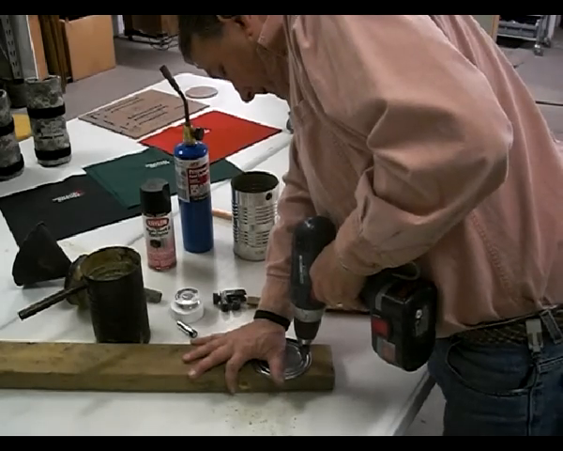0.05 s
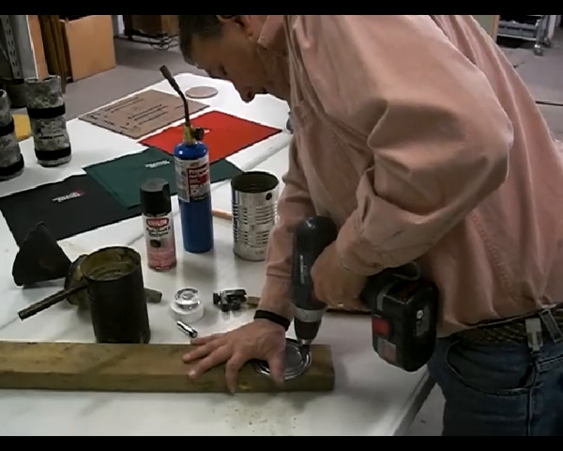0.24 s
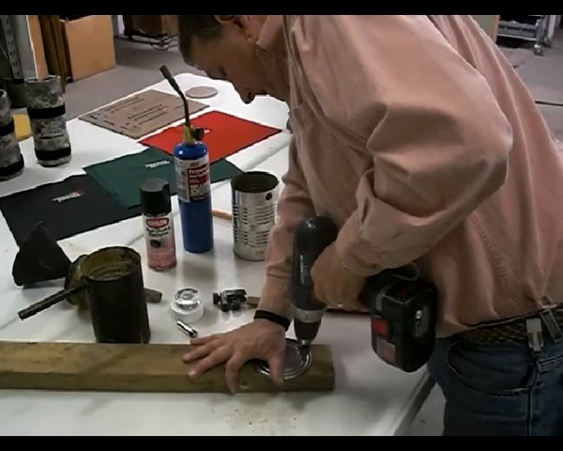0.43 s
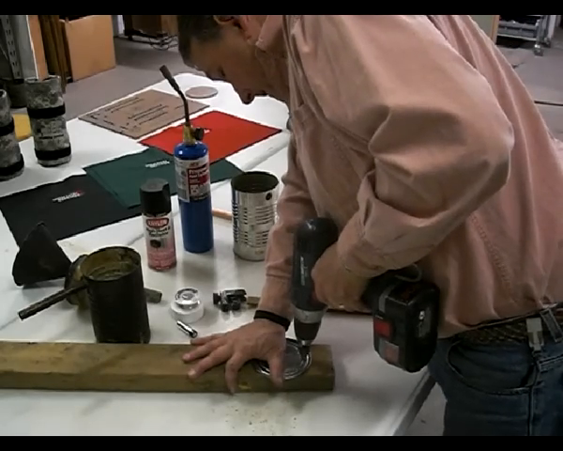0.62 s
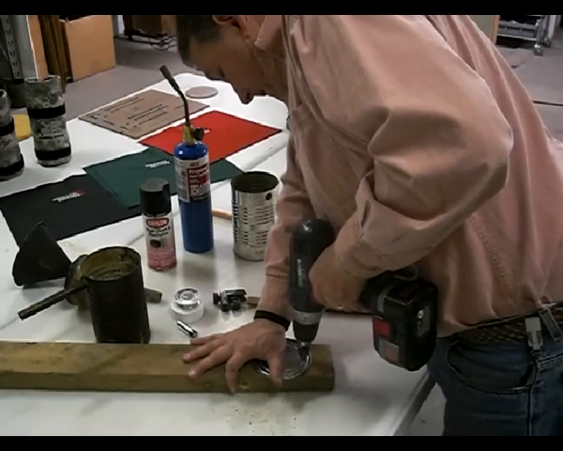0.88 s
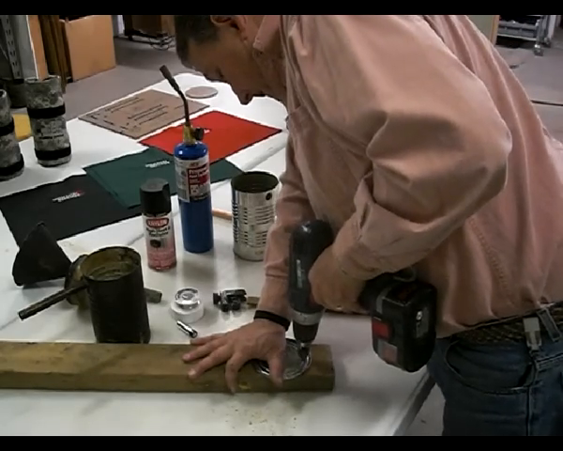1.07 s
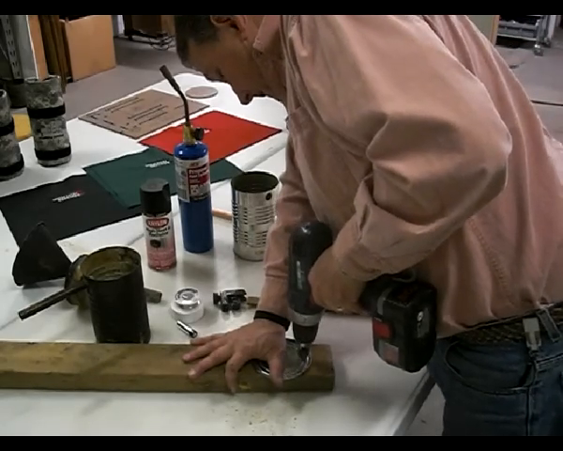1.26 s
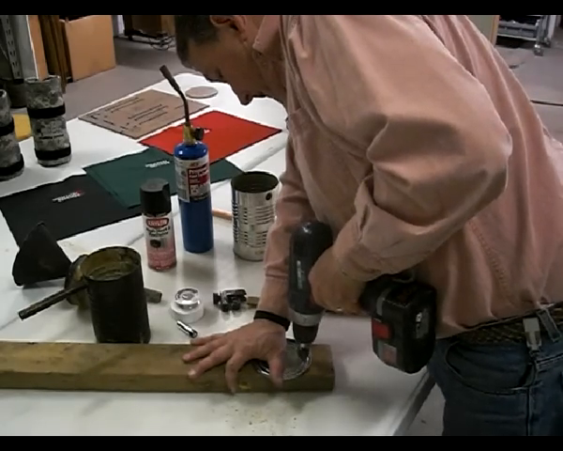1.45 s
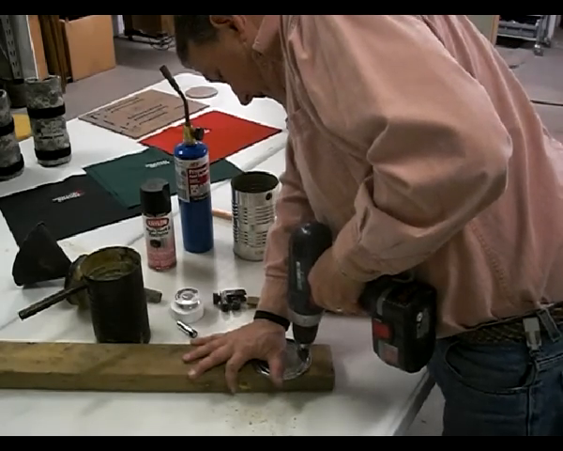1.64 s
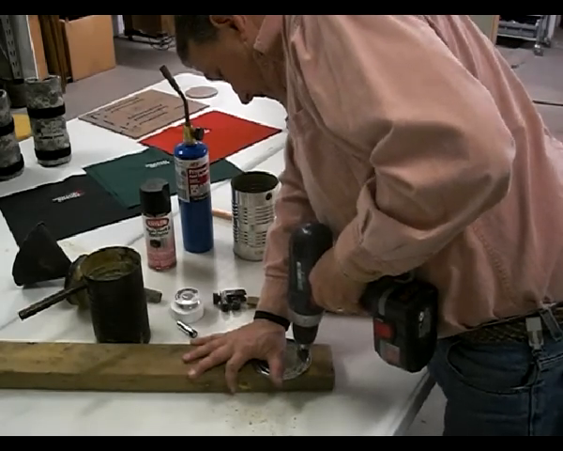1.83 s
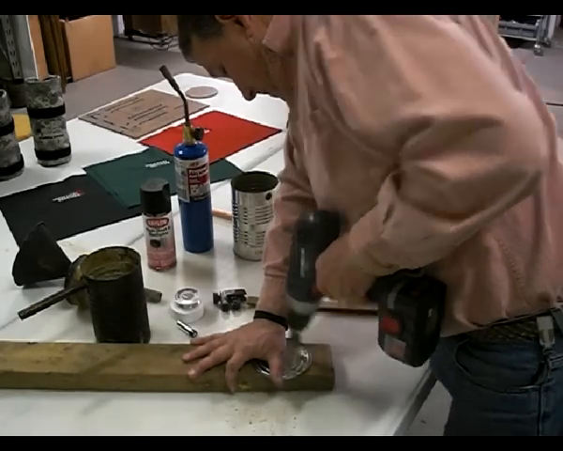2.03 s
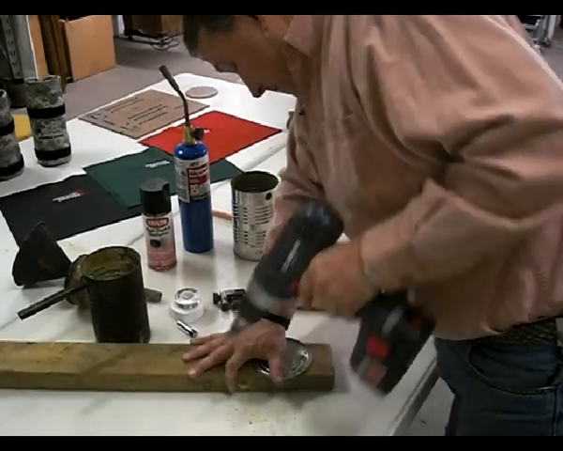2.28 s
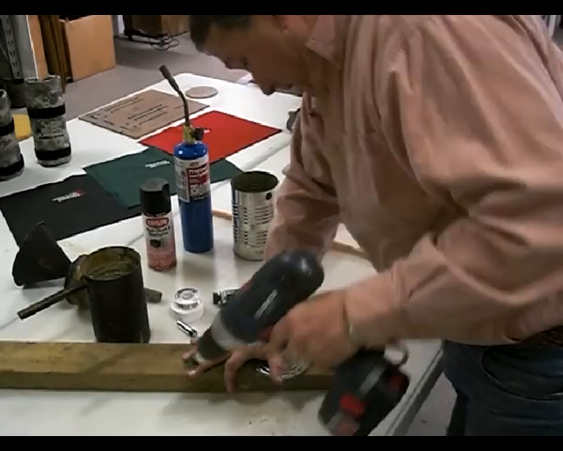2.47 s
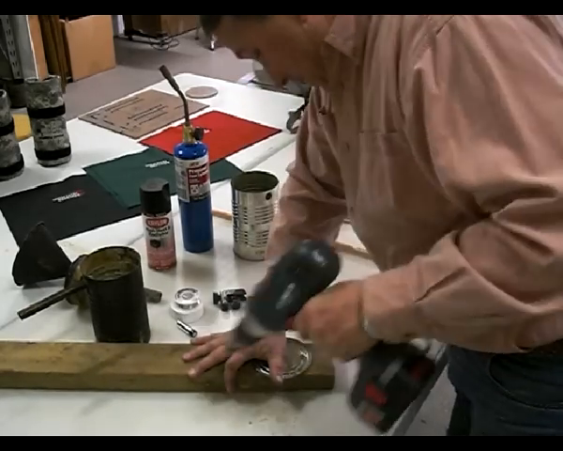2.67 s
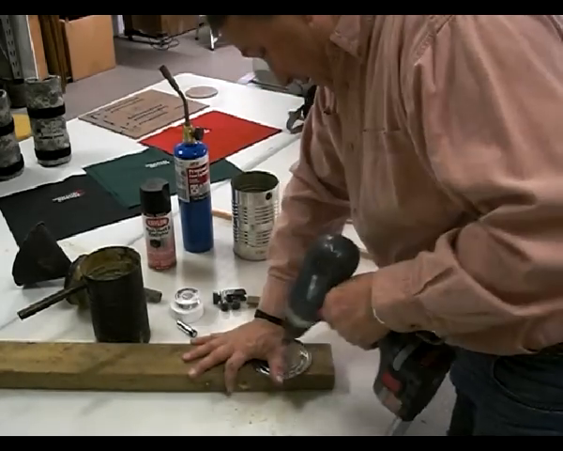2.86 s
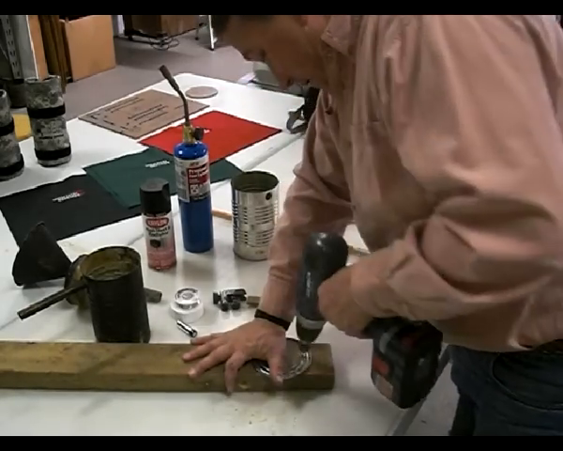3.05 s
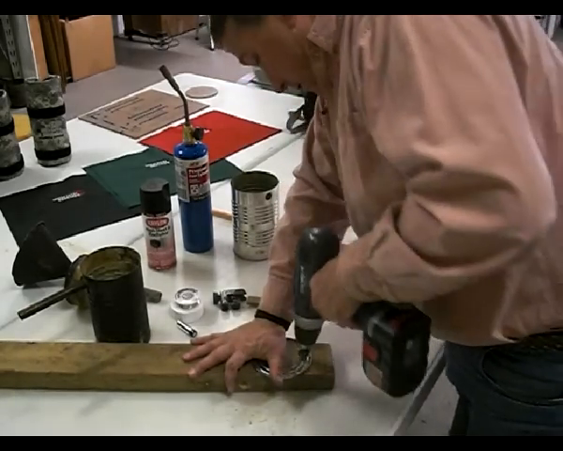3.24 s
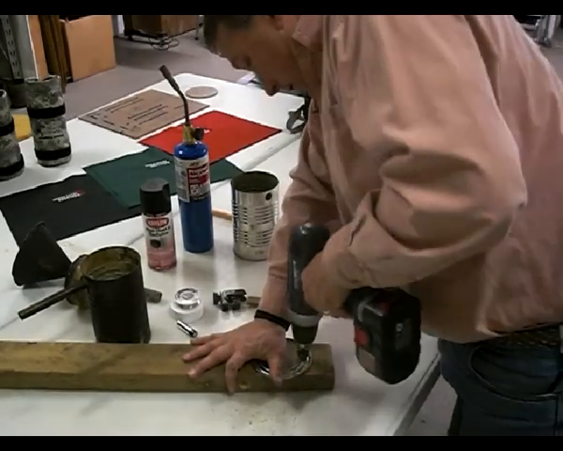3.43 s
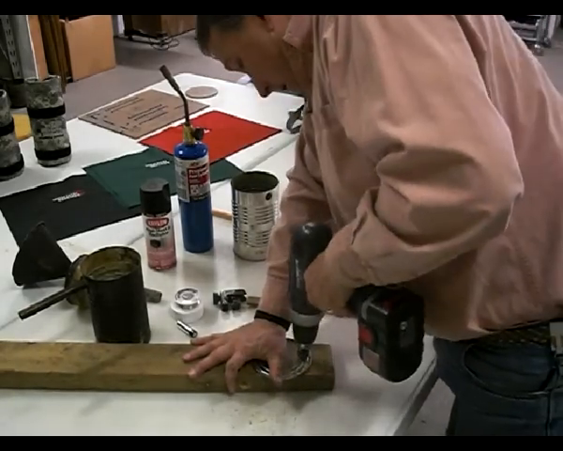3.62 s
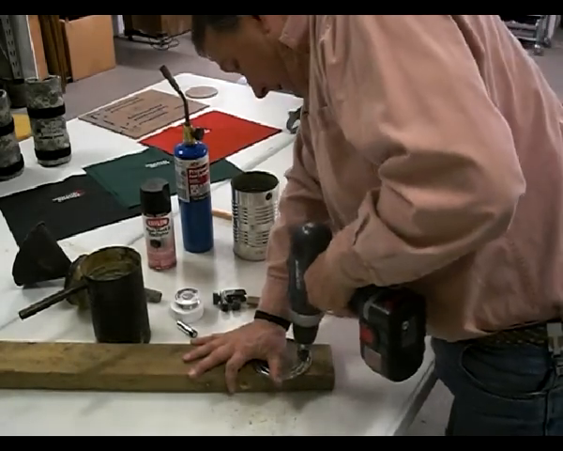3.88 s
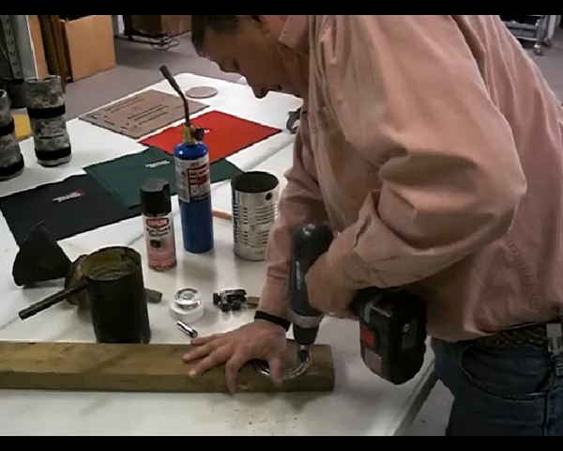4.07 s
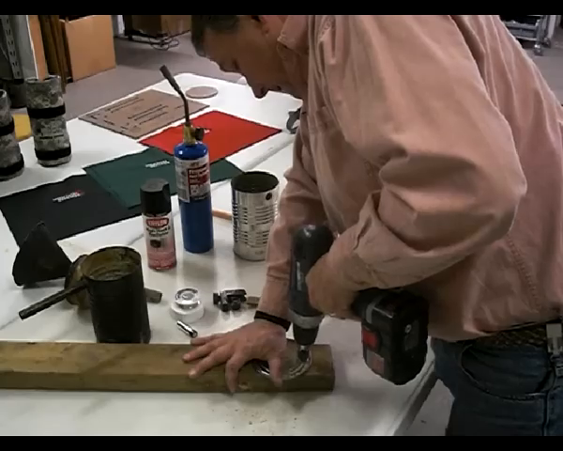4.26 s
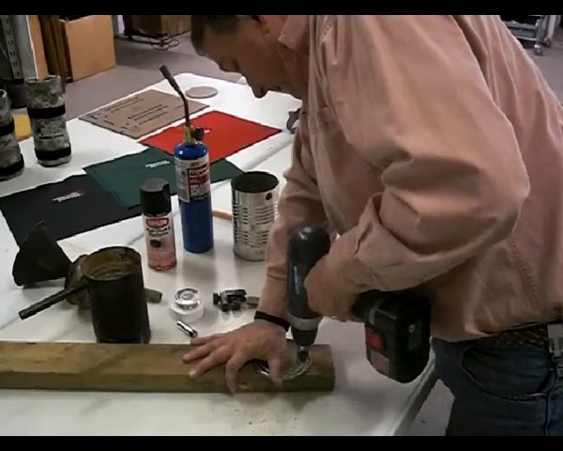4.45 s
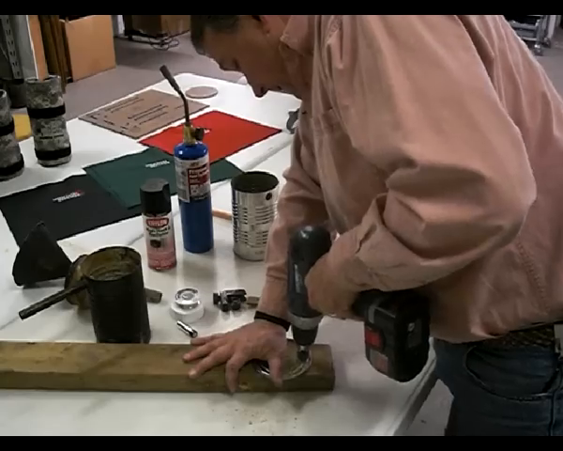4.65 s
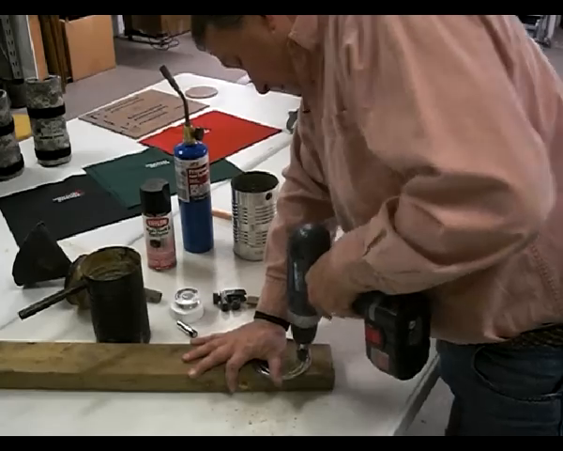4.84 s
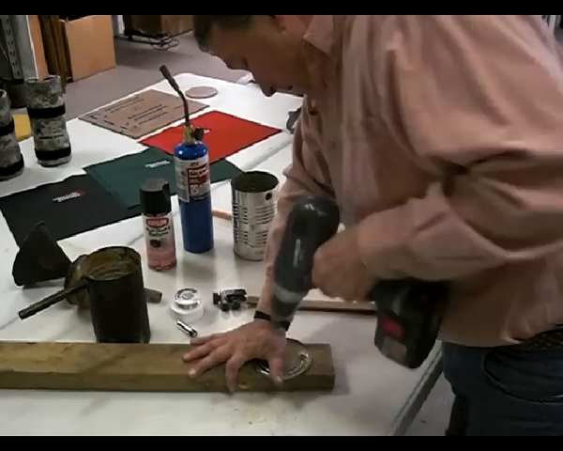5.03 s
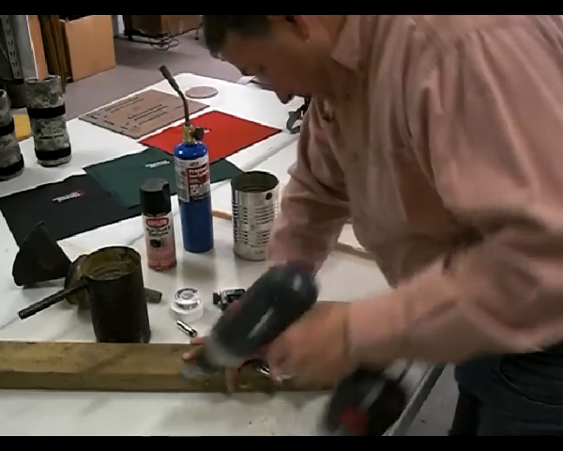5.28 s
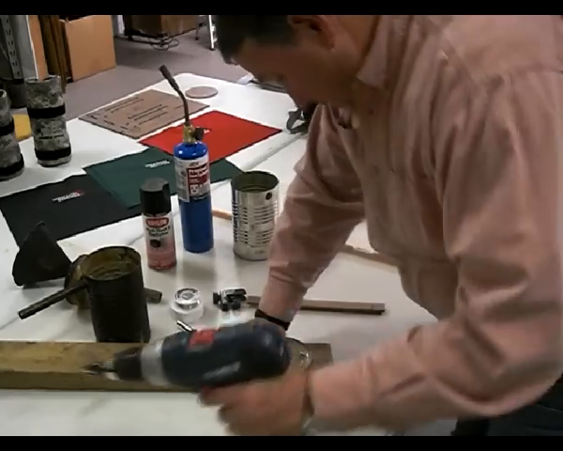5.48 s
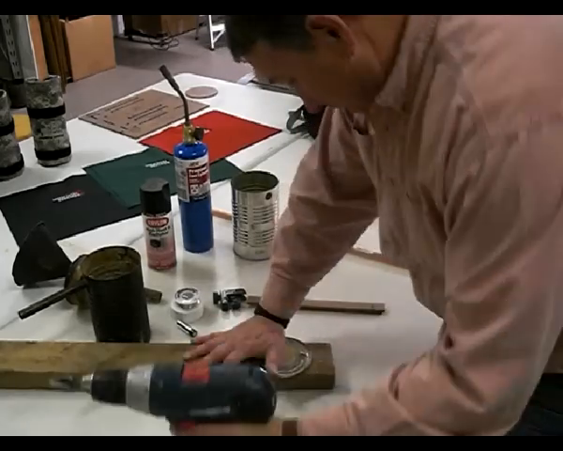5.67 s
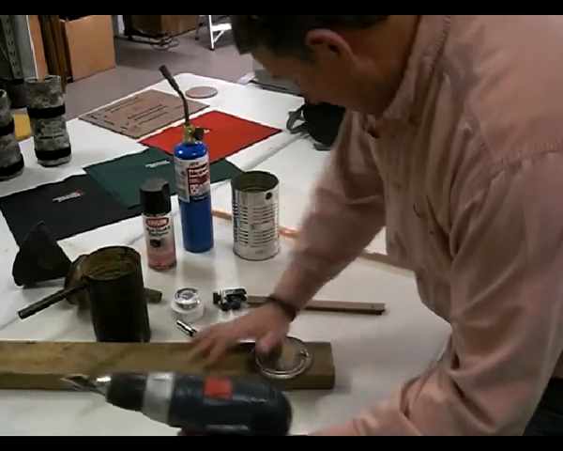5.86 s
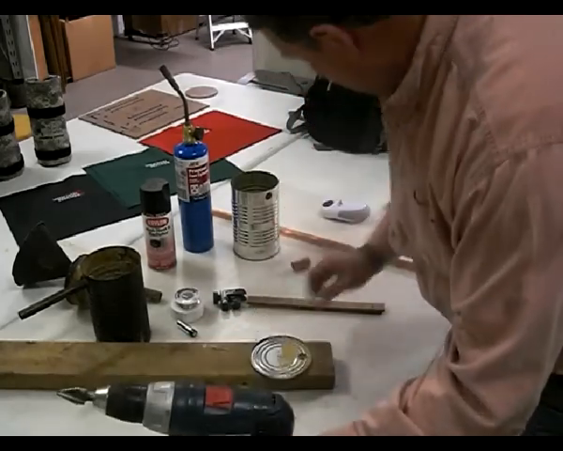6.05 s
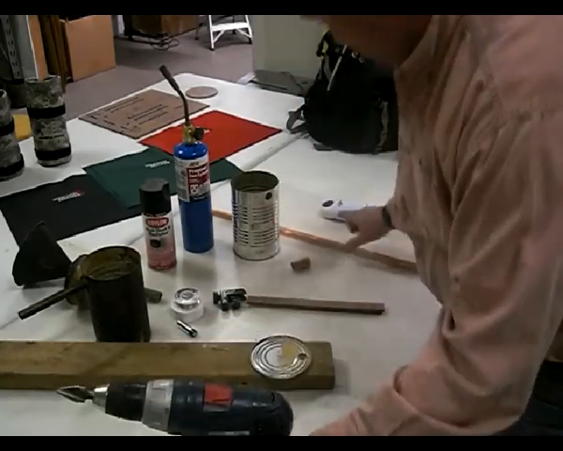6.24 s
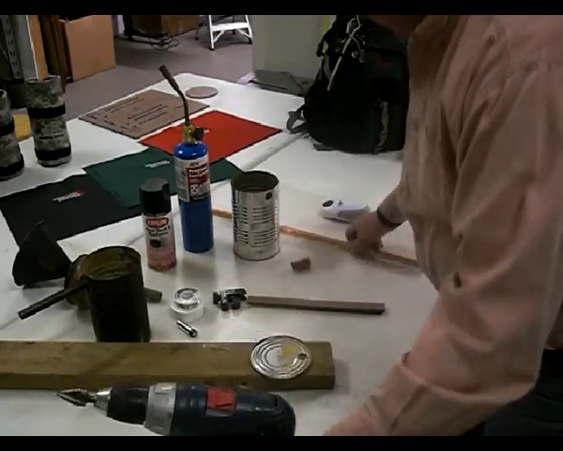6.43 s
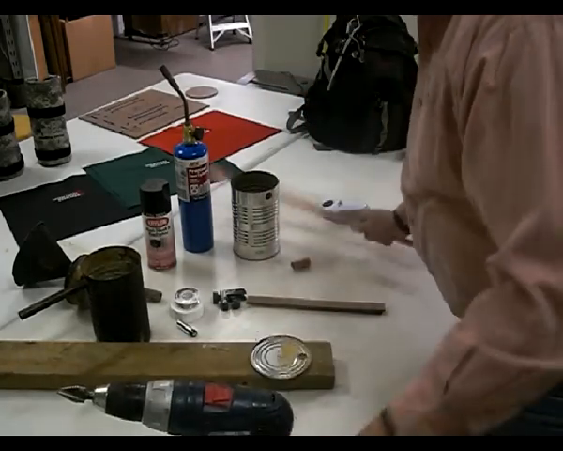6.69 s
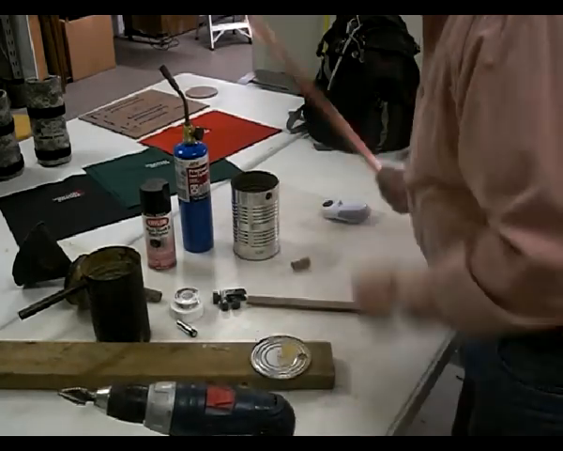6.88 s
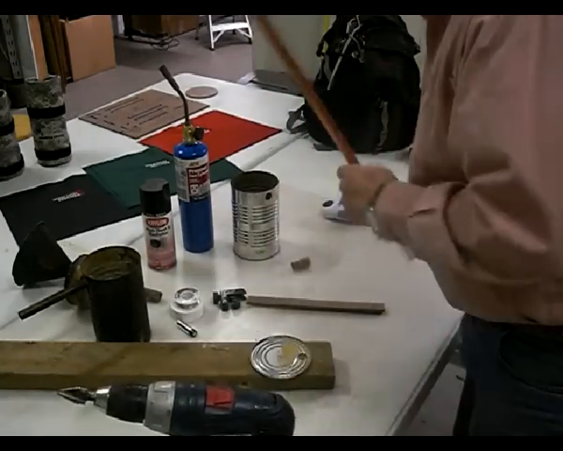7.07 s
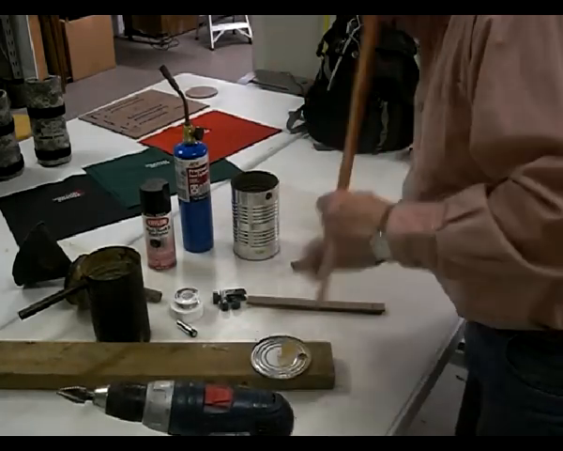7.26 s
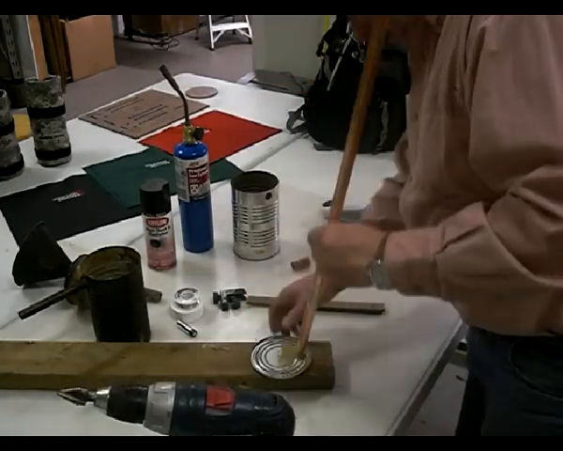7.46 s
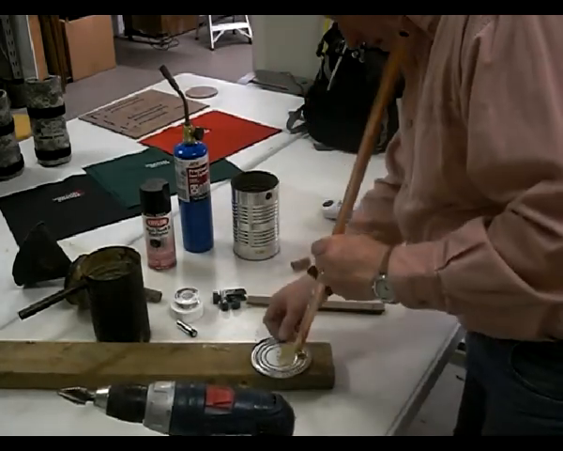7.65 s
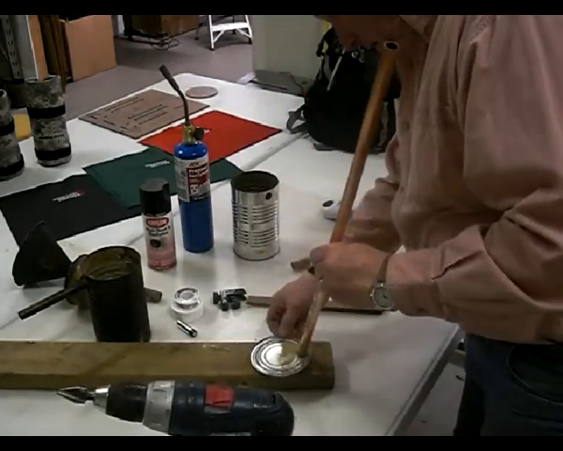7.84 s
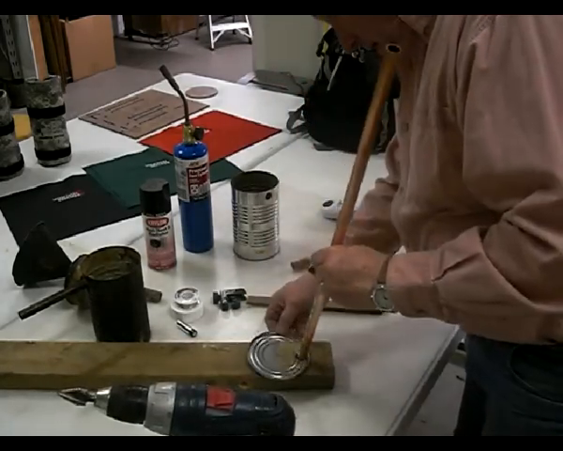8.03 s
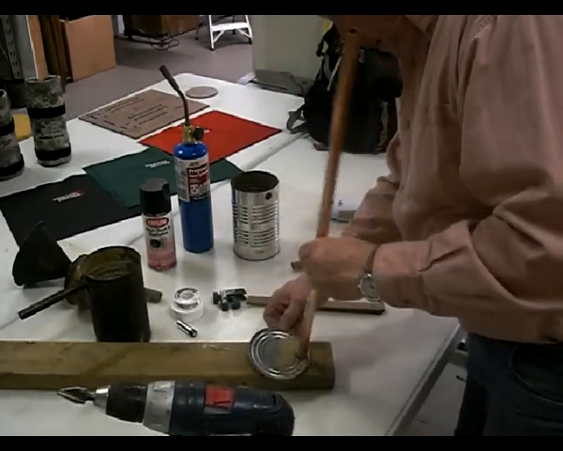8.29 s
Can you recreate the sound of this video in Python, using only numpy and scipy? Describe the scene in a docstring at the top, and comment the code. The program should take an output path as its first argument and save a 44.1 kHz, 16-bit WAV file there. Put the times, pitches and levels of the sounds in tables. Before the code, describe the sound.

A drill is already cutting thin steel at 0 s, loud and gritty, in a quiet workshop with a short room echo, heard close. Its gear whine slides gradually downward until 2 s, over tearing metal, motor hiss, lid rattle and sharp snaps, especially from 1 to 1.9 s. It scrapes and fades out by 2.3 s. Near-quiet follows, then light bit ticks on the lid from 3.2 to 3.46 s. The second run climbs quickly from 3.5 s, holds around 4 s, with a hard snap at 4.2, sags near 4.55, recovers and stops around 4.9-5.05 s. Dry plastic clicks come at 5.55-5.65 s; knocks and dull thuds on plank and bench at 5.8-6.1 s. Faint cloth and hand brushing continues, with a soft knock at 7.8 s. From 7.97 to 8.07 s a copper pipe clinks rapidly on the lid, ringing briefly.

```python
"""A cordless drill with a step bit bores into a steel lid held on a plank, in a quiet, faintly rustling workshop.
Gears whine at multiples of the motor speed, noise grains tear and snap, and plank and bench resonate.
The bit scrapes to a stop, ticks on the lid as modes of steel, and bores a second time.
Then hard clicks ring the drill's shell, knocks rap plank and bench as it is laid down, and cloth brushes.
Last, a copper pipe clinks on the lid: short cracks excite the paired modes of pipe and lid."""
import sys
import numpy as np
from scipy import signal
from scipy.fft import rfft, irfft, next_fast_len
from scipy.io import wavfile

SR = 44100
rng = np.random.default_rng(int(sys.argv[2]) if len(sys.argv) > 2 else 0)


def transcribe(u):
    """Save the signal u as a 16-bit wav file named by the first command-line argument.

    u: samples, shape (n,) or (channels, n), limited to [-1, 1]; the rate is SR.
    q: integer samples, one column per channel.
    """
    v = np.clip(np.atleast_2d(u).T, -1, 1)
    q = np.round(v * 32767).astype(np.int16)
    wavfile.write(sys.argv[1], SR, q)


def boost(x):
    """Linear amplitude factor 10**(x/20) for a level x in decibels (scalar or array-like)."""
    u = np.asarray(x, float) / 20
    return 10 ** u


N = 366471

# The gearbox, one list per run. Each row: time in seconds, tooth mesh frequency in Hz.
GEAR_RUNS = [
    [(0, 1552), (.37, 1520), (.45, 1478), (.58, 1484), (.68, 1514), (.8, 1462), (.88, 1468), (1, 1412),
     (1.18, 1340), (1.32, 1365), (1.45, 1297), (1.58, 1288), (1.65, 1327), (1.75, 1298), (2, 1250)],
    [(3.55, 1050), (3.7, 1295), (3.8, 1400), (3.93, 1458), (4.2, 1456), (4.4, 1392), (4.5, 1252),
     (4.58, 1225), (4.66, 1288), (4.75, 1352), (4.87, 1384), (4.91, 1370)],
]
# Strength of the cut, one list per run. Each row: time in seconds, level in dB.
CUT_RUNS = [
    [(0, -20.5), (.2, -24.5), (.37, -22), (.45, -27.5), (1.05, -23.5), (1.12, -28.5), (1.35, -27.5),
     (1.5, -31), (1.93, -30.5), (2.05, -38.5), (2.12, -36), (2.28, -42.5), (2.33, -48.5)],
    [(3.481, -43.5), (3.486, -40), (3.5, -40), (3.62, -26.5), (3.75, -25), (3.86, -26.5), (4.1, -25),
     (4.3, -28.5), (4.45, -24.5), (4.6, -28), (4.85, -26.5), (4.92, -34.5), (5.05, -47)],
]
# Modes of pipe and lid together. Each row: frequency in Hz, level in dB, decay time t60 in seconds.
PIPE_MODES = [(544, -7, .1), (1136, -8, .2), (1470, -5, .14), (1631, -6, .13), (2304, -1, .13),
              (2498, -7, .16), (2643, -5, .16), (3106, -2, .16), (3591, -3, .18), (3797, 3, .08),
              (4075, -3, .16), (4300, -7, .05), (5050, -5, .07), (5728, -8, .1), (6487, -8, .07)]
# Modes of the bench. Each row: frequency in Hz, level in dB, decay time t60 in seconds.
BENCH_MODES = [(77, -5.5, 0.24), (95, 4, 0.23), (119, -5, 0.14), (150.4, 1, 0.17), (185, -5.5, 0.16),
               (264, -0.5, 0.119)]
# Modes of the plank. Each row: frequency in Hz, level in dB, decay time t60 in seconds.
PLANK_MODES = [(252, 0, 0.025), (322.2, -4.5, 0.097), (355.6, -5.5, 0.059), (419, -1, 0.06),
               (490, -10, 0.099), (626, -2.5, 0.036), (852, 0, 0.019), (1147, -1.5, 0.016)]
# The bit tip set on the lid. Each row: time in seconds, level of the contact in dB.
TIP_CONTACTS = [(3.213, -31.5), (3.225, -21.5), (3.237, -34.5), (3.2462, -22), (3.2588, -24),
                (3.3485, -29.5), (3.391, -26), (3.4139, -32.5), (3.46, -39.5)]

CRACK_S = .0015   # decay constant of a dry crack, s
IMPULSE_S = .00001   # decay constant of a blow so short that it is nearly one sample, s


def rms_one(x):
    """Normalisation: scales a signal to unit root-mean-square."""
    return x / np.sqrt(np.mean(x ** 2) + 1e-20)


def in_time(runs, silent):
    """Piecewise linear control: joins each run's columns by straight lines, with silent outside the runs."""
    t, out = np.arange(N) / SR, None
    for rows in runs:
        s, *columns = np.transpose(rows)
        if out is None:
            out = np.full((len(columns), N), silent)
        on = (t >= s[0]) & (t <= s[-1])
        out[:, on] = [np.interp(t[on], s, c) for c in columns]
    return out


def hump(middle_s, half_s):
    """Raised-cosine envelope: a smooth swell from 0 to 1 and back."""
    from_middle = (np.arange(N) / SR - middle_s) / half_s
    return np.cos(np.pi / 2 * np.clip(from_middle, -1, 1)) ** 2


def band_pass(x, low_hz, high_hz, order):
    """Butterworth filtering: passes the band between two corner frequencies."""
    return signal.sosfilt(signal.butter(order, [low_hz, high_hz], "band", fs=SR, output="sos"), x)


def low_pass(x, hz, order):
    """Butterworth filtering: passes what lies below one corner frequency."""
    return signal.sosfilt(signal.butter(order, hz, fs=SR, output="sos"), x)


def coloured(x, spectrum):
    """Spectral shaping: weights a steady signal over log frequency, then sets its rms to 1."""
    hz, db = np.transpose(spectrum)
    grid = np.fft.rfftfreq(N, 1 / SR) + 1
    gain = boost(np.interp(np.log(grid), np.log(hz), db))
    return rms_one(irfft(rfft(x) * gain, N))


def drift(rate):
    """Low-passed random process: chance variation of rms 1, mostly slower than rate in Hz."""
    control_hz, settle = 400, 400
    steps = rng.standard_normal(int(N / SR * control_hz) + settle)
    r = np.exp(-2 * np.pi * rate / control_hz)
    slow = signal.lfilter([1], [1, -2 * r, r * r], steps)[settle:]
    return np.interp(np.linspace(0, len(slow) - 1, N), np.arange(len(slow)), rms_one(slow))


def ring(force, hz, t60):
    """Damped resonance: a two-pole mode that decays by 60 dB in t60 seconds."""
    r, w = boost(-60 / (t60 * SR)), 2 * np.pi * hz / SR
    return signal.lfilter([0, np.sin(w)], [1, -2 * r * np.cos(w), r * r], force + 1e-18)


def body(force, modes):
    """Modal superposition: one force drives every mode of an object, neighbours in opposite phase."""
    return sum(ring(force, hz, t60) * boost(db) * (-1) ** k for k, (hz, db, t60) in enumerate(modes))


def blows(times, db, spread_s, size=6000):
    """Impulsive excitation: each blow is a dying jolt of noise, of unit energy before its gain."""
    jolts = rng.standard_normal((len(times), size)) * np.exp(-np.arange(size) / (spread_s * SR))
    out = np.zeros(N + size)
    for s, gain, jolt in zip(times, boost(db), jolts):
        out[round(s * SR):][:size] += gain * jolt / np.sqrt(np.sum(jolt ** 2))
    return out[:N]


def cracks(rows, decay_s, sharp, reach, splinter_db, size=900):
    """Contact impulse: a sharp first touch and decaying splinter noise, peaked at a centre frequency.

    Each row: time in seconds, peak in dB, centre in Hz. The band extends to reach times the centre.
    """
    out = np.zeros(N + size)
    bursts = rng.standard_normal((len(rows), size)) * boost(splinter_db)
    bursts[:, 0] = 1   # the first touch
    bursts = bursts * np.exp(-np.arange(size) / (decay_s * SR))
    for (s, db, hz), burst in zip(rows, bursts):
        broad = band_pass(burst, min(0.7 * hz, 1500), min(reach * hz, 15000), order=2)
        sound = broad + 3 * signal.lfilter(*signal.iirpeak(hz, sharp, fs=SR), broad)
        out[round(s * SR):][:size] += boost(db) * sound / np.abs(sound).max()
    return out[:N]


def struck_modes(rows, modes, ring_db, spread_s, luck_db):
    """Modal excitation: every contact wakes each mode and its higher twin with a strength of its own."""
    pair_ratio = 1.03
    s, db = np.transpose(rows)[:2]
    twins = [(hz * pair_ratio, mode_db - 6, .7 * t60) for hz, mode_db, t60 in modes]
    both = modes + twins
    luck = rng.normal(0, luck_db, (len(s), len(both)))
    out = 0
    for (hz, mode_db, t60), own_db in zip(both, luck.T):
        out = out + ring(blows(s, db + ring_db + mode_db + own_db, spread_s), hz, t60)
    return out


def grains(per_s, size_db):
    """Clustered random pulses: tiny tears of uneven size and sign, coming in clumps."""
    born = rng.random(N) < per_s * boost(2.5 * drift(35)) / SR
    sizes = boost(size_db * np.minimum(rng.exponential(1, N), 5))
    return born * sizes * rng.choice([-1, 1], N)


def gears():
    """Gear-mesh tones: motor-locked partials wobble with tooth errors and swell at housing resonances."""
    # How the housing radiates a gear tone. Each row: frequency in Hz, level in dB relative to the cut.
    housing = [(1250, -13), (1450, -11), (1490, -5), (1530, -2), (1560, 0), (2600, -12), (3000, -12),
               (3900, -18), (4150, -11), (4400, -6), (4650, -8), (5100, -10), (5400, -6), (5720, -5),
               (5900, -16), (6350, -5)]
    stage_ratio = 4.168   # second gear stage over the mesh
    mesh_hz = in_time(GEAR_RUNS, 0.)[0]
    load_db = in_time(CUT_RUNS, -120.)[0]
    hz, db = np.transpose(housing)
    # Each partial: multiple of the mesh, relative pitch jitter, level flutter in dB, own level in dB.
    partials = [(1, .0007, 1, 0), (2, .001, 3, 0), (3, .001, 3, 0),
                (stage_ratio, .0025, 3, 0),
                (.96 * stage_ratio, .004, 5, -5)]   # side tone of the second stage
    out = 0
    for k, jitter, flutter_db, own_db in partials:
        phase = 2 * np.pi * k * np.cumsum(mesh_hz * (1 + jitter * drift(27.8))) / SR
        level_db = load_db + own_db + np.interp(k * mesh_hz, hz, db) + flutter_db * drift(89)
        out = out + boost(level_db) * np.sin(phase)
    return (mesh_hz > 0) * out


def motor_hiss(tear):
    """Broadband noise over the tear, with bright sparse swarf ticks and the chuck's fixed resonance."""
    # Spectrum of the hiss. Each row: frequency in Hz, relative level in dB.
    hiss_colour = [(3000, -47.5), (4900, -13), (5620, -6.5), (6500, -6), (7640, -11), (11500, -20.5),
                   (16000, -27)]
    chuck_hz, chuck_width_hz, chuck_db = 5500, 180, -8   # level relative to the shaped hiss
    swarf = rms_one(grains(40, size_db=4.0))
    mixed = .6 * rms_one(tear) + .3 * swarf + rng.standard_normal(N)
    chuck = signal.lfilter(*signal.iirpeak(chuck_hz, chuck_hz / chuck_width_hz, fs=SR), tear)
    return coloured(mixed, hiss_colour) + boost(chuck_db) * rms_one(chuck)


def motor_hiss_db():
    """Speed dependence: the hiss, relative to the cut, grows with each octave of motor speed."""
    # The hiss falls away while the bit still scrapes, and surges as it spins free.
    # Each row: middle in seconds, half length in seconds, change in dB.
    hushes = [(2.075, 0.078, -22), (2.188, 0.053, 6), (3.501, 0.032, -10.5), (5.022, 0.1, -33)]
    per_octave_db, top_mesh_hz = 6.5, 1550
    s, mesh_hz = np.transpose(sum(GEAR_RUNS, []))
    octaves = np.log2(np.interp(np.arange(N) / SR, s, mesh_hz) / top_mesh_hz)
    return -7 + per_octave_db * octaves + sum(db * hump(s, half) for s, half, db in hushes)


def cutting():
    """Stochastic excitation: tearing grains sound from the lid, with motor hiss and the loose lid's rattle."""
    # Spectrum of the tearing. Each row: frequency in Hz, relative level in dB.
    cut_colour = [(600, -3.5), (900, -3.5), (1160, -7.5), (1440, -0.5), (1930, -3.5), (2900, 0),
                  (3350, -1.5), (3850, 0.5), (5100, -8.5), (7000, -33)]
    rattle_db, chatter_db = -11, 0.67   # rattle relative to the cut; rms depth of its irregular judder
    tear = grains(9000, size_db=3.5)
    hiss = boost(motor_hiss_db()) * motor_hiss(tear)
    # The lid ticking against the bit rings far shorter than when it is struck.
    damped = [(hz, db, t60 / 12) for hz, db, t60 in PIPE_MODES[4:12]]
    rattle = boost(rattle_db) * rms_one(body(grains(130, size_db=2.5), damped))
    level_db = in_time(CUT_RUNS, -120.)[0] + chatter_db * drift(22)
    return boost(level_db) * (coloured(tear, cut_colour) + hiss + rattle)


def drumming():
    """Forced vibration: one train of grains shakes the modes of plank and bench."""
    # The drill lurches and leans on plank and bench.
    # Each row: middle in seconds, half length in seconds, plank level in dB, bench level in dB.
    lurches = [(0.32, 0.11, -57, -29.5), (1.396, 0.29, -50, -43), (1.997, 0.18, -39.5, -36),
               (3.423, 0.14, -61, -42.5), (3.776, 0.19, -34.5, -33.5), (4.958, 0.099, -36, -44.5),
               (8.28, 0.08, -59, -47)]
    plank_db, bench_db = -10, -10   # relative to the cut
    cut_db = in_time(CUT_RUNS, -120.)[0]
    plank = boost(cut_db + plank_db) + sum(boost(db) * hump(s, half) for s, half, db, _ in lurches)
    bench = boost(cut_db + bench_db) + sum(boost(db) * hump(s, half) for s, half, _, db in lurches)
    shake = grains(900, size_db=2.0)
    return plank * rms_one(body(shake, PLANK_MODES)) + bench * rms_one(body(shake, BENCH_MODES))


def workshop(x):
    """Diffuse reverberation: after a short gap, octave bands of noise each decay at their own rate."""
    # Decay of the room. Each row: frequency in Hz, decay time t60 in seconds.
    room = [(150, 0.91), (500, 0.73), (1400, 0.77), (4000, 0.55), (10000, 0.34)]
    t, tail = np.arange(SR) / SR, 0
    hz, t60 = np.transpose(room)
    for low in 50 * 2. ** np.arange(8):
        band = band_pass(rng.standard_normal(SR), low, 2 * low, order=2)
        band_t60 = np.interp(np.log(low * 1.4), np.log(hz), t60)
        tail = tail + band * boost(-60 * t / band_t60)
    tail = tail * np.clip((t - .002) / 0.0012, 0, 1)
    return signal.fftconvolve(x, tail / np.sqrt(np.sum(tail ** 2)))[:N]


def stirring():
    """Filtered noise: the quiet workshop, with cloth and feet stirring in random patches."""
    # Level of the stirring. Each row: time in seconds, level in dB.
    stir_rows = [(2.398, -62), (3.2, -60), (5.4, -59), (6.4, -53.5), (6.9, -55.5), (7.7, -54),
                 (8.31, -50.5)]
    # Its spectrum. Each row: frequency in Hz, relative level in dB.
    stir_colour = [(30, -35.5), (57, -9.5), (90, -1.5), (151, -0.5), (250, -6), (487, -8), (1000, -13),
                   (1960, -12), (5870, -20), (11500, -39.5), (16000, -34.5)]
    s, db = np.transpose(stir_rows)
    stir_db = np.interp(np.arange(N) / SR, s, db) + drift(3)
    murmur = boost(stir_db) * coloured(rng.standard_normal(N), stir_colour)
    cloth = rms_one(grains(1500, size_db=3.0) * boost(7 * drift(2.5)))
    return murmur + boost(stir_db - 15.5) * band_pass(cloth, 1500, 9000, order=1)


def snaps():
    """Sudden fracture: chips snap and the bit catches on the lid, each a narrowly peaked crack."""
    # Each row: time in seconds, peak in dB, centre frequency in Hz.
    snap_rows = [(0.3844, -8, 6250), (1.063, -8, 3500), (1.1442, -8, 3800), (1.3851, -8, 5570),
                 (1.6012, -5, 3880), (1.699, -10, 2870), (1.7563, -13, 3100), (1.889, -7, 4000),
                 (1.922, -16, 3280), (2.09, -20, 2800), (2.2302, -24, 2840), (2.2632, -14, 4500),
                 (3.7887, -9, 4210), (4.0336, -9, 4380), (4.2017, -2.5, 3900), (4.515, -6, 3000),
                 (4.974, -22, 3530)]
    return cracks(snap_rows, decay_s=.003, sharp=3.0, reach=2.4, splinter_db=-15)


def touches():
    """Light impact: the bit tip ticks on the lid with a dry crack and a short ring of steel modes."""
    # Short rings of the bit on the lid. Each row: frequency in Hz, level in dB, decay time t60 in seconds.
    bit_modes = [(2850, 0, .012), (3500, -4, .01), (4150, -5, .01), (5200, -6, .01), (5950, -5, .01),
                 (7000, -10, .008)]
    rows = [(s, db - 5, 2940) for s, db in TIP_CONTACTS]   # centre 2940 Hz
    ticks = cracks(rows, decay_s=CRACK_S, sharp=1.5, reach=4.0, splinter_db=-10)
    return ticks + struck_modes(TIP_CONTACTS, bit_modes, ring_db=-7, spread_s=.002, luck_db=2.0)


def pushes():
    """Slow excitation: each touch pushes the bench, and its low-passed force wakes the low plank modes."""
    soft_hz, plank_db, bench_db = 476, -41.5, -50.5
    touch_s = np.transpose(TIP_CONTACTS)[0]
    push = blows(touch_s, 0 * touch_s, spread_s=0.016)
    soft = low_pass(push, soft_hz, order=3)
    return body(boost(plank_db) * soft, PLANK_MODES) + body(boost(bench_db) * push, BENCH_MODES)


def clicks():
    """Impact on a thin shell: hard dry clicks, as the drill is swung away, ring its plastic modes."""
    # Each row: time in seconds, level of the contact in dB, centre frequency in Hz.
    click_rows = [(5.536, -31.5, 1210), (5.5551, -8.5, 1227), (5.577, -30, 897), (5.6156, -23, 2470),
                  (5.648, -27.5, 2780), (6.202, -38.5, 2070)]
    # Short rings of the plastic shell. Each row: frequency in Hz, level in dB, decay time t60 in seconds.
    shell_modes = [(870, -4, .022), (1300, -6, .018), (1910, -9, .015), (2300, -9, .012), (2850, -7, .015),
                   (3400, -8, .012)]
    rows = [(s, db - 0.5, hz) for s, db, hz in click_rows]
    dry_clicks = cracks(rows, decay_s=CRACK_S, sharp=.8, reach=4.5, splinter_db=-19)
    return dry_clicks + struck_modes(click_rows, shell_modes, ring_db=-19, spread_s=IMPULSE_S, luck_db=1.5)


def knocks():
    """Impact of a heavy body: a crack and a rap on the plank, then a slow force on the bench modes."""
    # Things set down on the bench.
    # Each row: time in seconds, crack peak in dB, plank blow in dB, bench thud blow in dB.
    knock_rows = [(5.7862, -9.5, -28, -34.5), (5.9116, -21, -30.5, -41), (5.937, -38, -26.5, -28.5),
                  (5.966, -39, -48, -29), (5.9468, -13, -31, -43), (6.133, -27.5, -45, -45),
                  (6.4192, -44.5, -39.5, -42), (7.804, -29, -31, -26.5)]
    crack_hz, thud_hz, thud_delay_s = 1143, 150, .002
    s, crack_db, plank_db, thud_db = np.transpose(knock_rows)
    rows = [(start, db, crack_hz) for start, db in zip(s, crack_db)]
    dry_knocks = cracks(rows, decay_s=CRACK_S, sharp=.8, reach=4.5, splinter_db=-19)
    rap = blows(s, plank_db, spread_s=0.026)
    thud = np.abs(blows(s + thud_delay_s, thud_db, IMPULSE_S))   # a push in one direction
    slow = low_pass(thud, thud_hz, order=2)
    return dry_knocks + body(rap, PLANK_MODES) + body(slow, BENCH_MODES)


def brushes():
    """Friction noise: cloth or hands brush faintly, as band-passed grains under smooth swells."""
    # Each row: middle in seconds, half length in seconds, level in dB.
    brush_rows = [(6.447, 0.058, -64), (6.616, 0.081, -63.5), (7.31, 0.097, -62.5), (7.639, 0.022, -64)]
    swish = band_pass(grains(3406, size_db=-1.5), 4000, 11000, order=2)
    return rms_one(swish) * sum(boost(db) * hump(s, half) for s, half, db in brush_rows)


def pipe():
    """Coupled modal ringing: every clink cracks, rattles the loose lid and rings the pipe's paired modes."""
    # The copper pipe on the lid. Each row: time in seconds, level of the contact in dB.
    clink_rows = [(7.9734, -17.5), (8.032, -21), (8.0381, -13.5), (8.056, -12.5), (8.065, -11.5),
                  (8.073, -23)]
    s, db = np.transpose(clink_rows)
    rows = [(start, level - 9, 5000) for start, level in clink_rows]   # centre 5000 Hz
    dry_clinks = cracks(rows, decay_s=0.0025, sharp=0.92, reach=4.3, splinter_db=-13)
    lid = band_pass(blows(s, db + 7, spread_s=.03), 550, 6500, order=2)
    rung = struck_modes(clink_rows, PIPE_MODES, ring_db=-18.5, spread_s=IMPULSE_S, luck_db=2.5)
    return dry_clinks + lid + rung


def scene():
    """Superposition: direct sound of drill and blows, their reverberation, and the quiet room."""
    drill_room_db, gear_room_db, blow_room_db = -12, -5, -4.5   # gears relative to the drill's echo
    whine = gears()
    drill = cutting() + drumming() + snaps() + touches()
    struck = pushes() + clicks() + knocks() + pipe()
    # Blows send less treble and deep bass into the room.
    dull = band_pass(struck, 110, 4500, order=1)
    # The gear tones reach the walls more weakly than the cut.
    to_walls = boost(drill_room_db) * (drill + boost(gear_room_db) * whine) + boost(blow_room_db) * dull
    quiet = stirring() + brushes()
    return (whine + drill + struck + workshop(to_walls) + quiet)[None]


def top_cut(x):
    """Nothing passes above the cut-off."""
    return signal.sosfilt(signal.butter(12, 16950, fs=SR, output="sos"), x)


def record(dry):
    """Band limitation: the recorder drops the lowest bass, steps down above a shelf and ends at its top."""
    shelf_hz, shelf_db, top_hz = 12050, -12, 15830
    size = next_fast_len(N + SR)
    hz = np.fft.rfftfreq(size, 1 / SR)
    response = np.where(hz > shelf_hz, boost(shelf_db), 1) * (hz < top_hz)
    limited = irfft(rfft(dry, size) * response, size)[:, :N]
    mix = signal.sosfilt(signal.butter(3, 48, "high", fs=SR, output="sos"), limited)
    return top_cut(mix)


dry = scene()
out = record(dry)
transcribe(out)
```